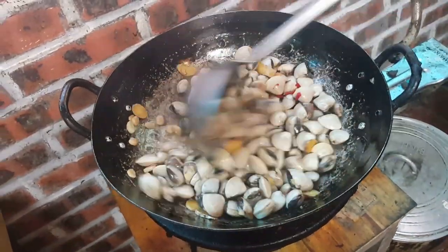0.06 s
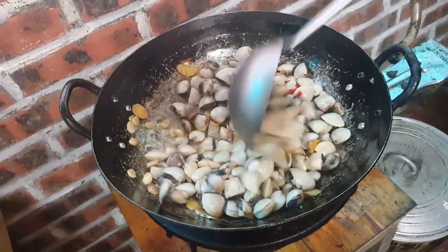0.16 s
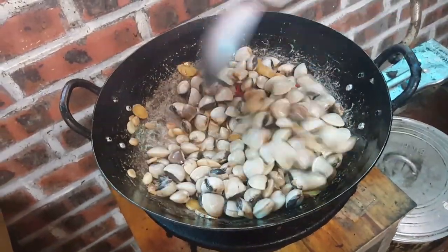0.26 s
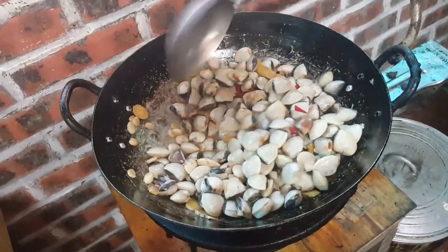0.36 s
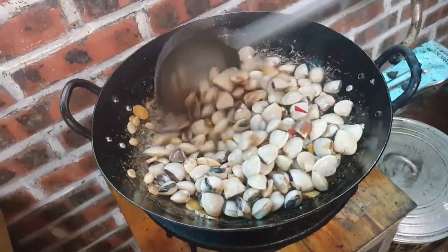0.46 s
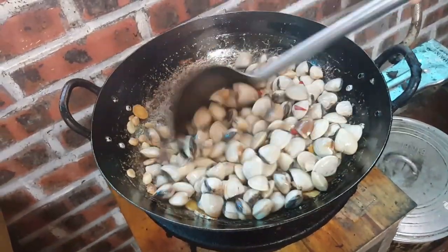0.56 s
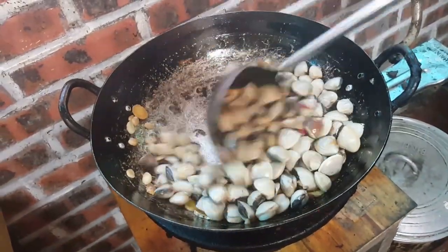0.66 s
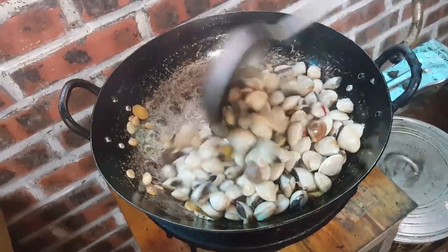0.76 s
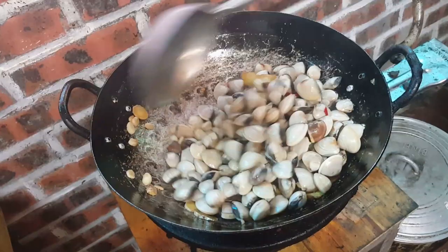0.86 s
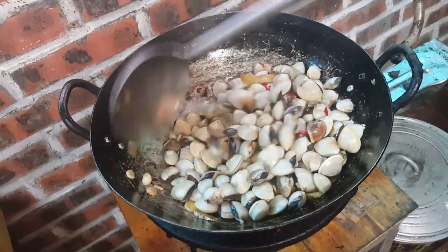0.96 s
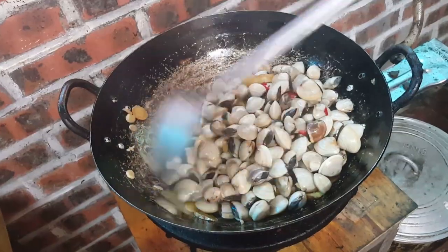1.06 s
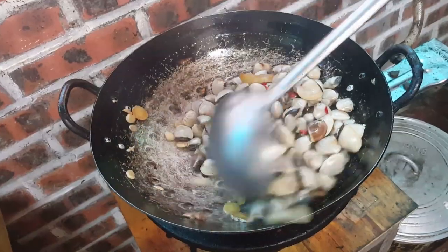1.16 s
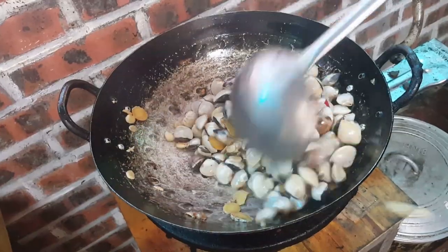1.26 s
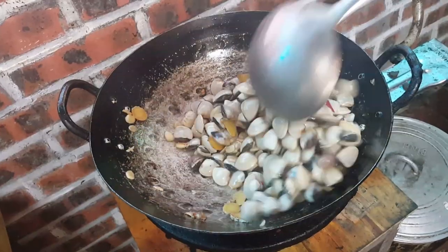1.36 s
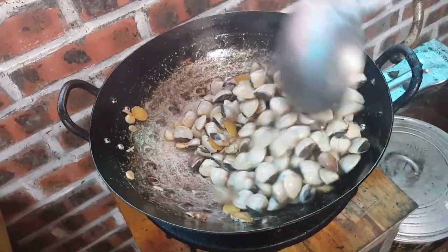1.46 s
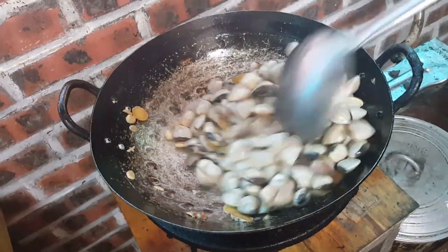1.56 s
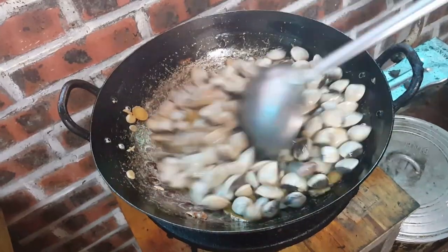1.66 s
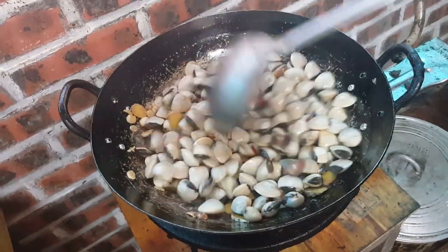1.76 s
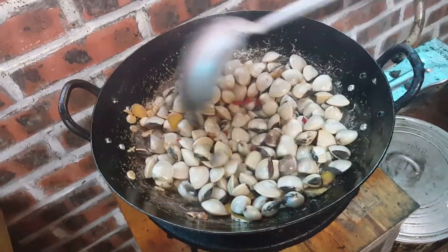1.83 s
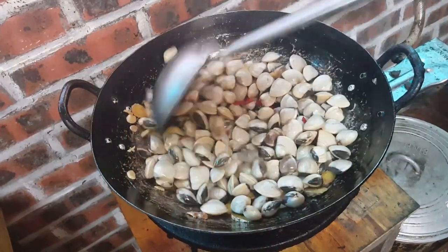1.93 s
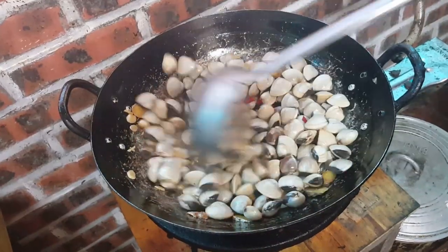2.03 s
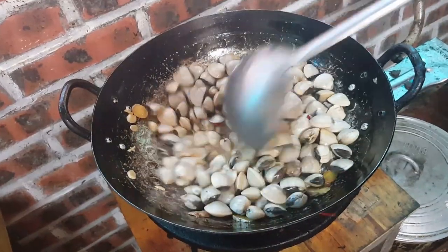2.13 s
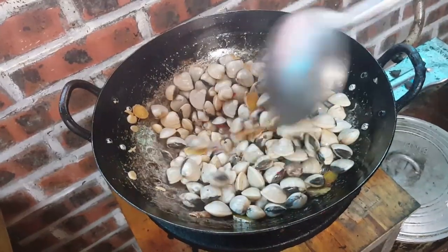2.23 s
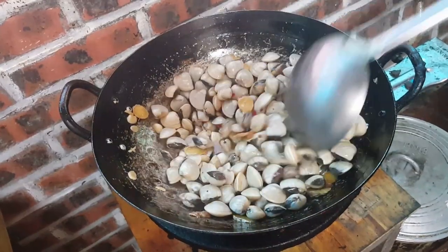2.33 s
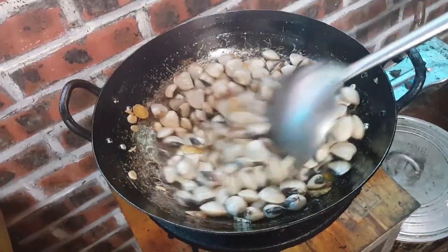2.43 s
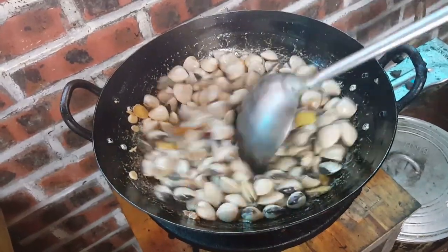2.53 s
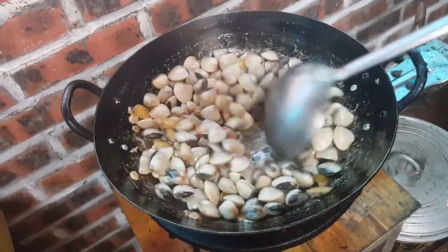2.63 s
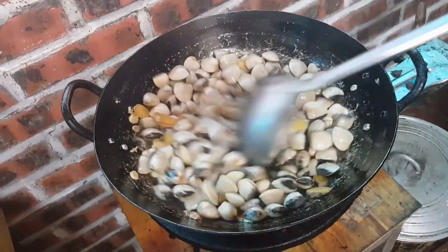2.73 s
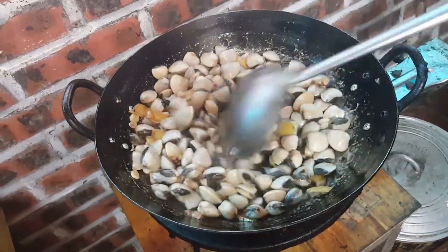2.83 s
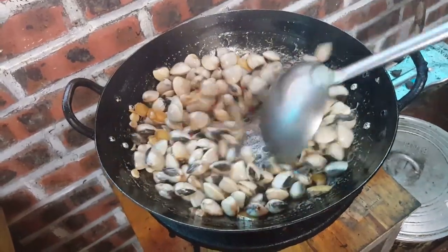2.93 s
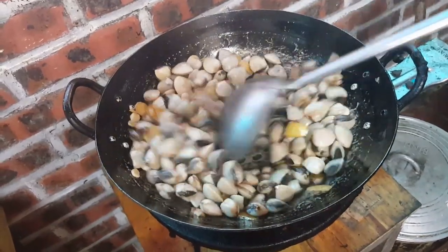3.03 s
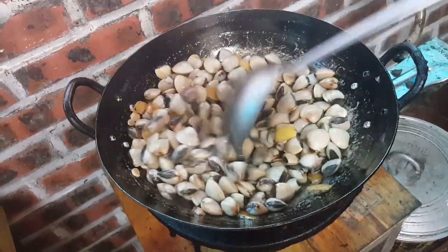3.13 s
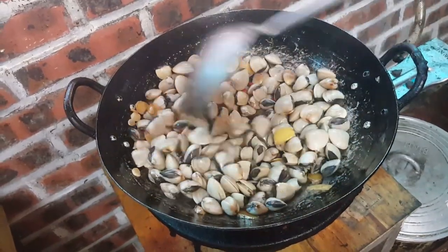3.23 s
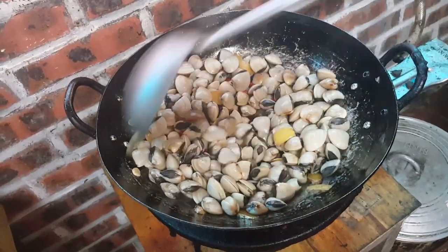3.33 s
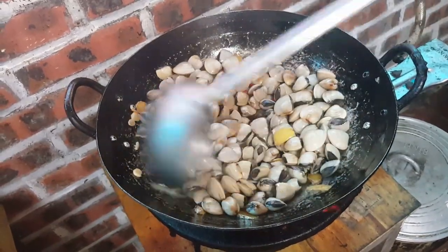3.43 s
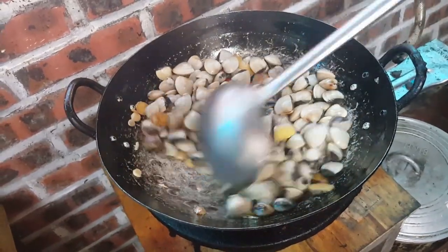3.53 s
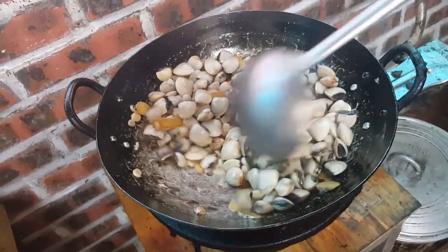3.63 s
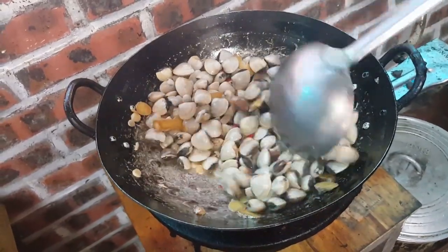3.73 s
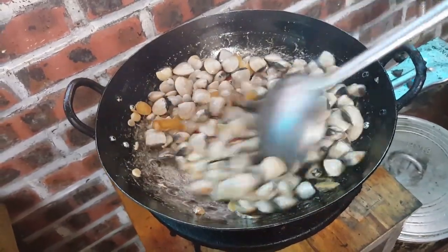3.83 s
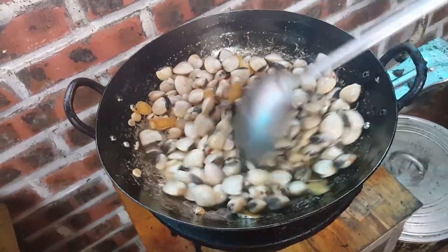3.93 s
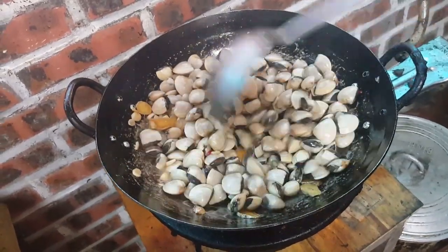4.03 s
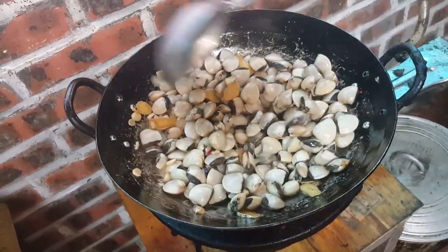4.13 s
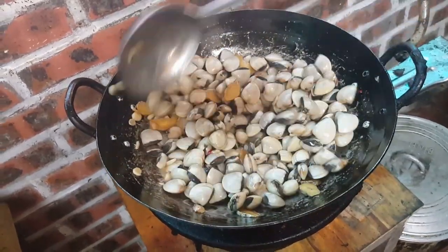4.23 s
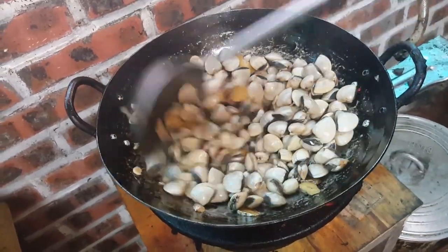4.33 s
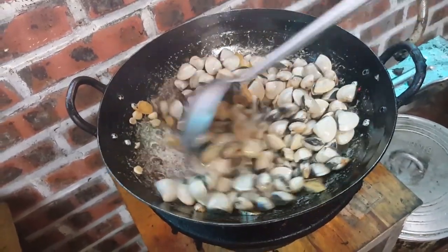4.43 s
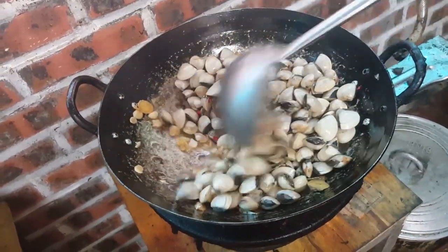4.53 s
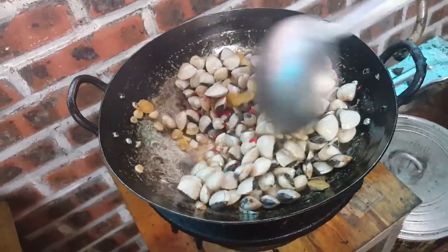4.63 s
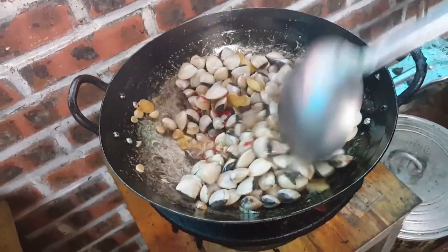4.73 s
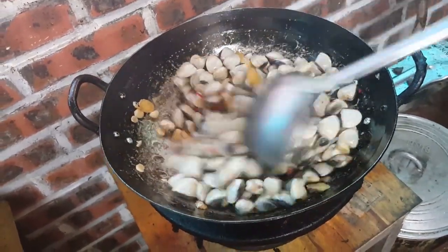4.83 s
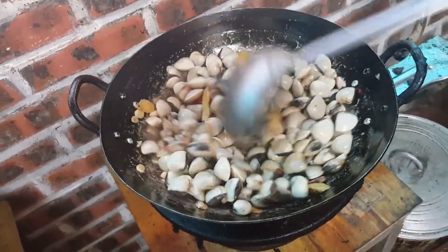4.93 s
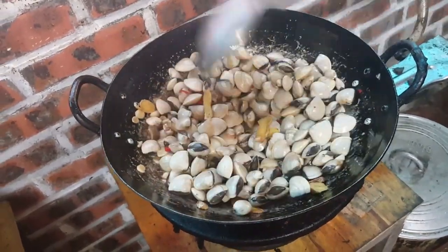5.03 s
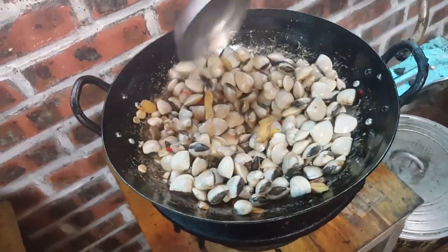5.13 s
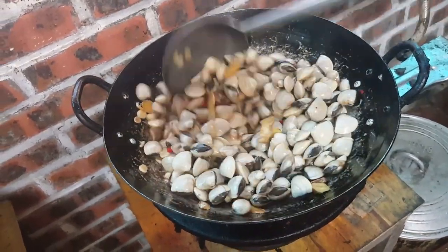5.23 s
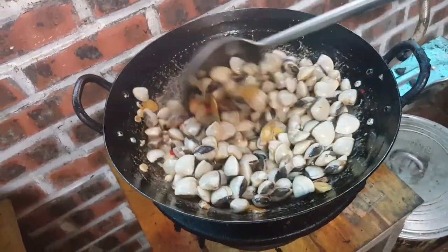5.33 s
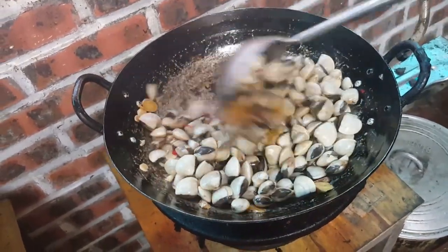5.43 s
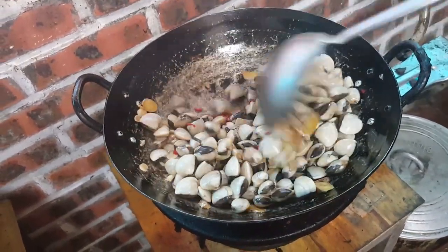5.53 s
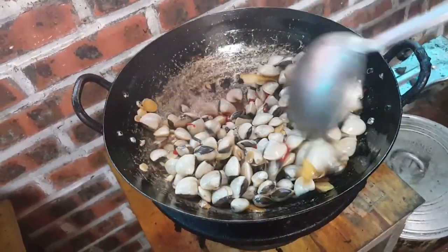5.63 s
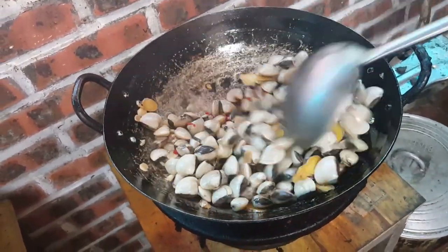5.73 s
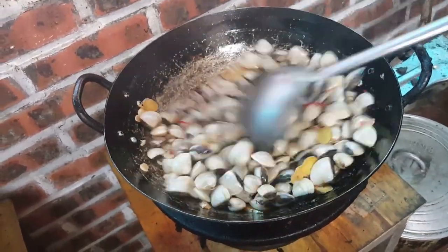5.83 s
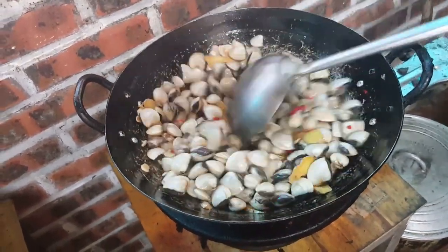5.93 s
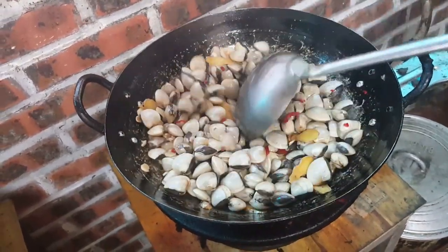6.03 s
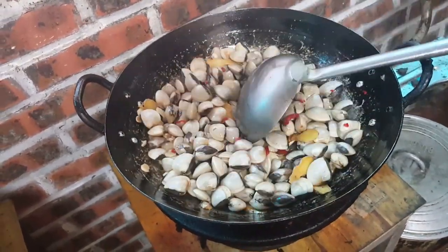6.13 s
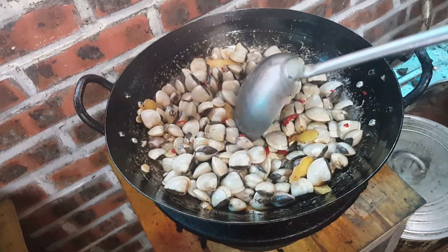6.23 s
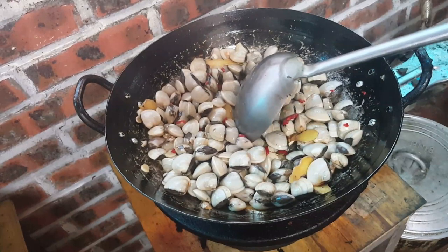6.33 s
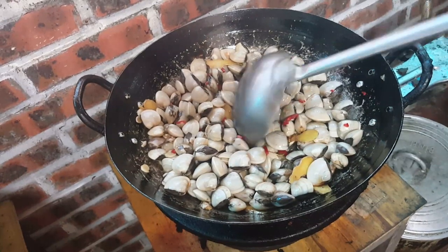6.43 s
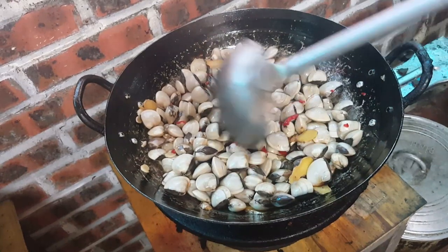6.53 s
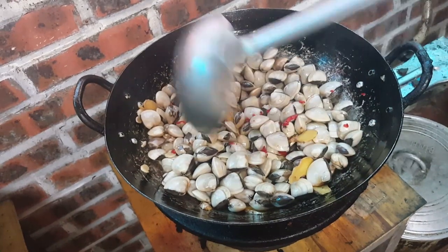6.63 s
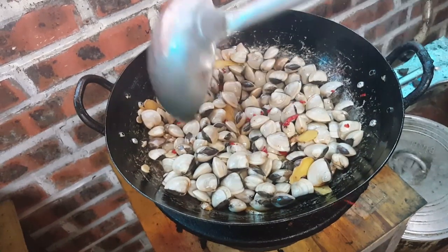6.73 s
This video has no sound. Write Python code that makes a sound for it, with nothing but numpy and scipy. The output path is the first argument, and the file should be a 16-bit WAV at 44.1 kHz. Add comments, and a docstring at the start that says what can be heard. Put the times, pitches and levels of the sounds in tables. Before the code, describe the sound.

Close, wide stereo beside a wok outdoors near a brick wall. At once a ladle thuds dully into small clams, which rattle, clack and drum over bubbling sizzle. Around 0.4-0.6 s come sharp knocks, short sinking scrapes and a shell surge; another push at 1.2 s brings wet hiss. A strong thud and dense clatter land at 1.7 s, with a scrape at 2.0. From 2.1 to 3.1 s quick jabs shake the shells, with a hard knock near 2.5. After a brief lull, a scrape and flaring hiss come at 3.4, and a heavy knock and surge at 3.87. More digging, clinks and scrapes follow at 4.2-4.4, a push at 4.85, scraping at 5.2, and the biggest rattle at 5.85. Then activity fades: a faint knock at 6.24, a lone clink at 6.6, sizzle rising slightly to the end at about 6.8. The low burner roar and hum is strongest mid-way.

```python
"""A steel ladle thuds into a loaded iron wok, outdoors by a brick wall: damped wok modes and a dead thock.
Small clams then clatter, drum and clink: dense random collisions, separate clacks, and ticks with rings.
The ladle's edge scrapes: a stick-slip rasp with a sinking resonance. Juice sizzles as bursting bubbles
and hiss, flaring on bared iron. Below, the burner is filtered noise with a wavering hum; short
reflections surround the wok."""
import sys
import numpy as np
from scipy import signal
from scipy.fft import rfft, irfft, next_fast_len
from scipy.io import wavfile

SR = 44100
rng = np.random.default_rng(int(sys.argv[2]) if len(sys.argv) > 2 else 0)


def unload_audio(sound):
    """Save the sound as a 16-bit wav file, at the path given as the first command line argument."""
    columns = np.transpose(np.atleast_2d(sound))
    # keep every value between -1 and 1, then stretch to whole-number steps
    steps = np.round(np.clip(columns, -1, 1) * 32767)
    wavfile.write(sys.argv[1], SR, steps.astype(np.int16))


N = 298998
TIME = np.arange(N) / SR

# Event and source levels are relative: each source trims them further.
# the ladle digs in and bares iron: start_s, hold_s, shell_level_db, flare_level_db
DIG_STROKES = [(0.05, 0.029, -41, -38), (0.512, 0.044, -27, -38), (1.19, 0.028, -23, -34.5),
               (1.565, 0.09, -42, -40), (1.951, 0.055, -27, -31.5), (3.43, 0.13, -25, -38),
               (4.231, 0.08, -24.5, -42), (4.335, 0.044, -25.5, -27), (5.194, 0.049, -21.5, -35)]
# the heap piles up and tumbles back: crest_s, rise_constant_s, fall_constant_s, shell_level_db, drum_level_db
HEAP_PUSHES = [(.12, 0.12, 0.24, -23.5, -32), (.59, 0.21, 0.17, -22, -32.5), (1.24, 0.16, 0.064, -24, -30),
               (1.675, 0.1, 0.1, -18, -24), (3.54, 0.017, 0.04, -22, -28.5),
               (3.86, 0.14, 0.086, -19, -24.5), (4.41, 0.065, 0.12, -22, -31.5),
               (4.85, 0.086, 0.1, -19.5, -27.5), (5.28, 0.03, 0.33, -24, -32),
               (5.865, 0.097, 0.044, -17.5, -21.5)]
# quick jabs shake the shells: crest_s, shell_level_db
QUICK_JABS = [(2.11, -24.5), (2.39, -25.5), (2.51, -21), (2.651, -22.5), (2.774, -20), (2.925, -20.5),
              (3.042, -19), (3.19, -29), (3.99, -22.5), (5.99, -27.5)]
# steady frying between strokes: time_s, level_db
SIMMER_CURVE = [(0, -22), (.3, -30.5), (.85, -33.5), (1.88, -29.5), (2.3, -35), (2.85, -33.5), (3.35, -30),
                (4.4, -29), (5.12, -30.5), (5.68, -29), (6.12, -37.5), (6.46, -39), (6.57, -31.5),
                (6.78, -31)]
# modes of a struck shell: factor on its ring pitch, level_db
SHELL_MODE_TABLE = [(.6, -14.5), (0.858, -12), (1, -2), (1.33, -7), (1.55, -6)]
# the ladle bumps the wok: start_s, level_db, factor on all mode and thock pitches
LADLE_KNOCKS = [(.002, -4.5, 0.59), (0.094, -11, 0.44), (0.4259, -1, 1.38), (.4425, -1.5, .68),
                (.491, -9.5, 0.7), (1.057, -13, 0.62), (1.707, 1.5, 1.01), (2.441, -7, 1.42),
                (2.4711, -9, 1.14), (2.5298, 2.5, 0.9), (2.684, -7, 0.97), (2.966, -1, 0.94),
                (3.471, -7.5, 0.56), (3.871, 3, 0.98), (4.248, -4, .66), (4.287, -3.5, 0.64),
                (4.383, -13, 1.03), (4.846, -4, 0.98), (5.1945, -12, 1.14), (5.2159, -6, 1.17),
                (5.836, -1, 0.76), (5.8691, 1.5, 0.97), (6.2357, -15.5, 0.99)]
# wok modes damped by the load: frequency_hz (before the knock's factor), level_db, t60_s
WOK_MODES = [(350, -31, 0.047), (522, 7.5, 0.15), (617, 12, 0.1), (735, 9.5, 0.07), (862, 13.5, 0.063),
             (2110, 5.5, 0.032)]
# shell and ladle clink on steel: start_s, level_db, ring_hz, spit_level_db (juice thrown up)
STEEL_CLINKS = [(.0635, -14, 2110, -20.5), (0.16, -13, 2290, -19), (.369, -8.5, 4430, -44),
                (0.413, -10, 1200, -41), (0.5462, -9.5, 2430, -36), (0.5597, -9, 2530, -36),
                (.629, -10.5, 2230, -44), (0.738, -15.5, 4440, -47), (0.7618, -15, 3960, -42),
                (.836, -17, 3750, -45), (0.8636, -8.5, 3880, -34), (1.13, -12, 1750, -23),
                (1.162, -18, 2010, -25), (1.192, -20, 1990, -19.5), (1.4805, -20.5, 1490, -23),
                (1.5732, -13, 1920, -19), (1.636, -8, 4380, -35), (1.669, -11, 2450, -40),
                (1.7068, -12, 2130, -26), (1.8028, -4.5, 2240, -40), (1.9798, -6, 5160, -18),
                (2.1134, -27, 2120, -22), (2.374, -23, 1860, -25.5), (2.4409, -11.5, 2220, -21),
                (2.7455, -22, 2780, -29), (2.7821, -11, 1900, -40), (2.8863, -11.5, 2540, -34),
                (2.9114, -11.5, 2340, -36), (3.161, -14, 2330, -23.5), (3.431, -8.5, 7260, -21),
                (3.818, -10, 2540, -40), (3.9075, -12, 3020, -40), (3.9373, -6.5, 2810, -21.5),
                (4.2461, -11.5, 4310, -18.5), (4.2874, -12, 2570, -32), (4.3196, -13, 2460, -17.5),
                (4.814, -10.5, 2090, -27), (4.8983, -12.5, 2300, -21), (4.989, -7, 2260, -43),
                (5.1949, -6.5, 4090, -22), (5.2151, -8, 1910, -32), (5.278, -9, 2540, -24),
                (5.2835, -14, 5600, -28), (5.4242, -13.5, 1360, -30), (5.531, -12, 3120, -38),
                (5.7184, -13, 5460, -46), (5.808, -6.5, 4350, -36), (5.8368, -12, 1800, -38),
                (5.9162, -12, 2790, -46), (5.928, -18, 2600, -46), (6.619, -13, 2660, -52)]
# the ladle's edge drags over iron: start_s, length_s, rasp_level_db, tone_level_db, first_hz, last_hz
EDGE_SCRAPES = [(0.414, 0.02, -20, -17, 1210, 1130), (0.429, 0.05, -27.5, -24, 660, 298),
                (0.48, 0.04, -21, -28.5, 1160, 264), (0.55, 0.13, -36, -26.5, 1330, 1250),
                (1.565, 0.031, -26.5, -29, 1830, 1820), (1.999, 0.04, -22, -25.5, 1190, 293),
                (2.068, 0.014, -22, -28.5, 480, 440), (2.471, 0.08, -28, -33, 530, 520),
                (3.432, 0.081, -29.5, -33, 590, 267), (4.235, 0.034, -22.5, -21.5, 530, 448),
                (5.193, 0.036, -29, -21, 1080, 261), (5.268, 0.025, -24, -27.5, 945, 696)]
# flame strength: time_s, level_db
FLAME_CURVE = [(0.0, -47), (0.72, -49.5), (3.27, -40.5), (3.55, -33), (5.81, -41), (6.25, -56.5),
               (6.78, -42)]

# Spectra, all with columns frequency_hz, density_db (dB per Hz, relative)
# shells tumbling on each other
SHELL_SPECTRUM = [(150, -25), (400, -11), (900, -2), (1250, -2.5), (2150, 1.5), (3000, -2.5), (4300, -0.5),
                  (7000, -5), (10000, -11.5), (15500, -25)]
# the pan drummed by the shells
DRUM_SPECTRUM = [(60, -69), (150, -13.5), (300, -17.5), (360, -5.5), (420, -10.5), (485, 3.5), (680, -10.5),
                 (745, 0), (950, -5.5), (1400, -30), (4000, -52)]
# steady frying
SIZZLE_SPECTRUM = [(200, -2), (1000, 3), (2500, 5.5), (4200, 3.5), (7000, 5), (8700, 3.5), (10200, -4),
                   (11800, 1.5), (15500, -2.5)]
# fresh juice on hot iron
FLARE_SPECTRUM = [(300, -3.5), (2500, -6), (7000, 4.5), (10000, 0), (12000, 5.5), (15500, -2)]
# a hard tick on steel
TICK_SPECTRUM = [(100, -18), (500, 0), (6500, 0), (14000, -10)]
# the ladle's scraping edge
RASP_SPECTRUM = [(100, -14), (400, 7), (1200, 7), (2200, -7), (4500, 8.5), (7000, 4.5), (10000, -6),
                 (11500, 1), (15500, -8)]
# the flame's roar
BURNER_SPECTRUM = [(24, -62), (43, -27), (65, -22), (100, -9.5), (125, 4.5), (170, -17), (1500, -23.5),
                   (8000, -41)]
# the reflected sound: frequency_hz, gain_db
REFLECTION_SPECTRUM = [(100, -4.0), (600, 0.0), (4000, 5), (14000, -16.0)]

# likeness of the two microphones: frequency_hz, coherence (interpolated, then limited to 0-1)
MICROPHONE_LIKENESS = [(100, 2.7), (350, 0.74), (700, 0.95), (1400, 0.5), (2800, 0.29), (5000, -0.41)]
# level difference of the microphones: frequency_hz, left_minus_right_db
MICROPHONE_BALANCE = [(500, 2), (1700, 4), (3000, 2.5), (4300, 1), (6400, 7), (8200, -1.5), (9800, -7),
                      (12000, -3), (15000, 0)]

EDGE_HZ = 15600  # upper band limit
DIG_ATTACK_S, DIG_RELEASE_S = 0.003, 0.04
PUSH_CREST_S = 0.019  # how rounded the top of a push is
JAB_RISE_S, JAB_FALL_S, JAB_CREST_S = 0.027, 0.03, 0.012
JAB_DRUM_FALL_S = 0.061  # the shells keep drumming a little longer
# relative to the stroke's shell level
DIG_DRUM_DB, JAB_DRUM_DB, JAB_FLARE_DB, STIRRED_SIZZLE_DB = -8, -8, -24, -9
SIMMER_SHELLS_DB, SIMMER_DRUM_DB = -1.5, -13.5  # boiling juice also rattles the shells


def stirring():
    """Power summation: incoherent strokes and simmer add as squares to drive shells, drum, frying and flares."""
    shell_power, drum_power, flare_power = np.zeros((3, N))
    for start, hold, shell_db, flare_db in DIG_STROKES:
        t = TIME - start
        release = np.exp(-np.clip((t - hold) / DIG_RELEASE_S, 0, 20))
        dig = np.clip(t / DIG_ATTACK_S, 0, 1) * release
        shell_power += (amp(shell_db) * dig) ** 2
        drum_power += (amp(shell_db + DIG_DRUM_DB) * dig) ** 2
        flare_power += (amp(flare_db) * dig) ** 2
    for crest, rise, fall, shell_db, drum_db in HEAP_PUSHES:
        push = swell(crest, rise, fall, PUSH_CREST_S)
        shell_power += (amp(shell_db) * push) ** 2
        drum_power += (amp(drum_db) * push) ** 2
    for crest, shell_db in QUICK_JABS:
        jab = amp(shell_db) * swell(crest, JAB_RISE_S, JAB_FALL_S, JAB_CREST_S)
        jab_drum = swell(crest, JAB_RISE_S, JAB_DRUM_FALL_S, JAB_CREST_S)
        shell_power += jab ** 2
        flare_power += (amp(JAB_FLARE_DB) * jab) ** 2
        drum_power += (amp(shell_db + JAB_DRUM_DB) * jab_drum) ** 2
    shells, drum, flare = np.sqrt([shell_power, drum_power, flare_power])
    simmer = level(SIMMER_CURVE)
    shell_gain = np.hypot(shells, amp(SIMMER_SHELLS_DB) * simmer)
    drum_gain = np.hypot(drum, amp(SIMMER_DRUM_DB) * simmer)
    fry_gain = np.hypot(amp(STIRRED_SIZZLE_DB) * shells, simmer)
    return shell_gain, drum_gain, fry_gain, flare


def swell(crest, rise_s, fall_s, round_s):
    """Exponential growth and decay about a rounded crest of height 1."""
    t = TIME - crest
    distance = np.hypot(t, round_s) - round_s
    return np.exp(-np.minimum(distance / np.where(t < 0, rise_s, fall_s), 20))


def jolts(per_s=35, settle_s=0.0037, depth=0.42):
    """Random impulsive release: small slides of the heap start at once and settle exponentially."""
    kicks = (rng.random(N) < per_s / SR) * rng.random(N)
    slides = decaying(kicks, settle_s)
    return unit(1 + np.tanh(depth * slides))


def clatter(shell_gain, drum_gain):
    """Random collision noise: shells tumble over each other and drum on the pan as the heap turns."""
    shells = grains(per_s=650, scatter_db=3.5, tick_s=0.00053, ring_s=0.0029, ring=0.81)
    drumming = grains(per_s=800, scatter_db=3.0, tick_s=0.0011, ring_s=0.0016, ring=0.12)
    shells = unit(spread(colour(shells, SHELL_SPECTRUM)))
    drumming = unit(spread(colour(drumming, DRUM_SPECTRUM)))
    return amp(-4) * shell_gain * shells + amp(-2.5) * drum_gain * drumming


def clacks(shell_gain, per_s=90, middle_hz=2500, pitch_spread=.33, cycles=6.7, clack_db=-0.5):
    """Impact of whole shells: separate clacks of log-normally varied pitch stand out of the rattle."""
    out = np.zeros((2, N))
    for at in np.flatnonzero(rng.random(N) < per_s / SR):
        hz = middle_hz * np.exp(pitch_spread * rng.standard_normal())
        strength = shell_gain[at] * amp(clack_db) * rng.uniform(0.33, 1)
        add(out, at / SR, strength * clack(hz, cycles))
    return out


def clack(hz, cycles, detune=.12):
    """Modal decay of one shell: detuned modes, the high ones out of step at the two microphones."""
    t = np.arange(SR // 25) / SR
    ratio, mode_db = np.transpose(SHELL_MODE_TABLE)[:, :, None]
    modes_hz = hz * ratio ** (1 + detune * rng.standard_normal(ratio.shape))
    lag_s = rng.standard_normal((2, len(ratio), 1)) * .00004
    turns = modes_hz * (t + lag_s) + rng.random(ratio.shape)
    decay = np.exp(-t * modes_hz / cycles)  # each mode falls by 1/e in this many cycles
    modes = amp(mode_db) * np.sin(2 * np.pi * turns) * decay
    return struck(modes.sum(1))


def knocks(low_hz=230, thock_hz=790, thock_db=2, thock_s=.002):
    """Damped modal impact: a dead thock and wok modes, stopped by the wet load; an open pan radiates little bass."""
    out, t = np.zeros((2, N)), np.arange(SR // 8) / SR
    radiation = signal.butter(2, low_hz, "high", fs=SR, output="sos")
    hz, mode_db, t60 = np.transpose(WOK_MODES)[:, :, None]
    mode_decay = np.exp(-np.log(1000) * t / t60)
    for start, db, pitch in LADLE_KNOCKS:
        phase = (rng.random((len(WOK_MODES), 1)) - .5) * np.pi  # the spot that is struck varies
        modes = amp(mode_db) * mode_decay * np.sin(2 * np.pi * hz * pitch * t + phase)
        thock = np.sin(2 * np.pi * thock_hz * pitch * t) * np.exp(-t / thock_s)
        blow = struck(modes.sum(0)) + amp(thock_db) * struck(thock)
        ring = struck(signal.sosfilt(radiation, blow))
        add(out, start, amp(db - 13.5) * np.array([ring, ring]))
    return out


def clinks(wet_tick_db=7, damping=2, tick_s=.0018, tick_db=-5, dry_ring_s=.0038):
    """Contact and liquid damping: a broad tick, then a shell's ring; juice sharpens the tick and damps the ring."""
    out, t = np.zeros((2, N)), np.arange(SR // 25) / SR
    for start, db, hz, spit_db in STEEL_CLINKS:
        ring_s = dry_ring_s / (1 + damping * amp(spit_db - db))
        burst = spread(rng.standard_normal((2, len(t)))) * np.exp(-t / tick_s)
        tick = struck(colour(burst, TICK_SPECTRUM))
        ring = amp(db) * clack(hz, hz * ring_s)
        tick_gain = np.hypot(amp(db + tick_db), amp(spit_db + wet_tick_db))
        add(out, start, amp(-8.5) * (ring + tick_gain * tick))
    return out


def scrapes(width_hz=220, fade_db=5, thrum_db=-8, thrum_hz=500):
    """Stick-slip friction: a rasp excites a hollow resonance that sinks as the ladle slides."""
    out = np.zeros((2, N))
    catches = grains(per_s=1700, scatter_db=0.0, tick_s=0.000057, ring_s=0.0039, ring=0.82)
    rasp = unit(spread(colour(catches, RASP_SPECTRUM)))
    slips = rng.standard_normal(N)
    pan_band = signal.butter(2, [110, 420], "band", fs=SR, output="sos")
    thrum = unit(signal.sosfilt(pan_band, slips))
    radius = np.exp(-np.pi * width_hz / SR)
    for start, length, rasp_db, tone_db, first_hz, last_hz in EDGE_SCRAPES:
        span = slice(round(start * SR), round((start + length) * SR))
        u = np.linspace(0, 1, span.stop - span.start)
        hz = first_hz * (last_hz / first_hz) ** u
        turn = np.exp(2j * np.pi * np.cumsum(hz) / SR)
        # shift the moving resonance to zero frequency, filter there, shift it back
        envelope = signal.lfilter([1], [1, -2 * radius, radius ** 2], slips[span] / turn)
        tone = unit((turn * envelope).real)
        shake = amp(thrum_db) * np.minimum(thrum_hz / hz, 1) ** 2  # low scrapes shake the whole pan
        press = amp(-fade_db * u) * np.minimum(10 * (1 - u), 1)  # lands hard, eases off
        hollow = amp(tone_db) * (tone + shake * thrum[span])
        add(out, start, press * (amp(rasp_db) * rasp[:, span] + hollow))
    return out


def sizzle(fry_gain, flare_gain, spit_s=0.015):
    """Vapour bubble bursting: tiny pops over even hiss; digs, jabs and clinks bring juice to hot iron, which spits."""
    pops = grains(per_s=1500, scatter_db=-3.0, tick_s=0.00015, ring_s=0.0003, ring=1.0)
    frying = pops + amp(5.5) * rng.standard_normal((2, N))
    frying = unit(spread(colour(frying, SIZZLE_SPECTRUM)))
    splashes = np.zeros(N)
    for start, *_, spit_db in STEEL_CLINKS:
        splashes[round(start * SR)] = amp(spit_db)
    spits = decaying(splashes, spit_s)
    bursts = grains(per_s=2200, scatter_db=3.5, tick_s=0.00013, ring_s=0.00088, ring=0.59)
    steam = bursts + amp(-2) * rng.standard_normal((2, N))
    steam = unit(spread(colour(steam, FLARE_SPECTRUM)))
    steam = jolts(per_s=120, settle_s=0.0062, depth=1.0) * steam
    return fry_gain * frying + np.hypot(amp(7) * flare_gain, spits) * steam


def burner(hum_hz=93.8, width_hz=4):
    """Combustion noise and resonance: a low roar with a phase-wavering hum at the stove's resonance."""
    roar = unit(spread(colour(rng.standard_normal((2, N)), BURNER_SPECTRUM)))
    slow = signal.butter(2, width_hz, fs=SR, output="sos")
    waver = unit(signal.sosfilt(slow, rng.standard_normal(N)))
    hum = unit(np.sin(2 * np.pi * hum_hz * TIME + .5 * waver))
    return level(FLAME_CURVE) * amp(-8.0) * (roar + hum / np.sqrt(2))


def yard(x, t60=0.35, first_s=0.0032, size=2048):
    """Diffuse reflection from pan and wall: decaying random paths, redrawn per block as the shells move."""
    t = np.arange(6 * size) / SR
    fade = np.exp(-np.log(1000) * t / t60) * (t > first_s)
    fade /= np.linalg.norm(fade)
    out, window = np.zeros((2, N)), signal.windows.cosine(size)
    for at in range(0, N - size, size // 2):
        paths = rng.standard_normal((2, len(t))) * fade
        block = x[:, at:at + size] * window
        add(out, at / SR, signal.fftconvolve(block, paths, axes=1))
    return spread(colour(out, REFLECTION_SPECTRUM))


def grains(per_s, scatter_db, tick_s, ring_s, ring, size=640):
    """Poisson collisions: ticks with brief rings of random pitch; scatter_db sets the spread of strengths."""
    t, out = np.arange(size) / SR, np.zeros((2, N + size))
    starts = np.flatnonzero(rng.random(N) < per_s / SR)
    chance = rng.random((N, 2))[starts]
    strength = amp(scatter_db * np.minimum(-np.log(1 - chance[:, 0]), 3.2))
    pitch_hz = np.geomspace(1000, 13000, 400)[:, None, None]
    phase = rng.random((len(pitch_hz), 2, 1))
    waves = np.sin(2 * np.pi * (pitch_hz * t + phase))
    tones = unit(waves * np.exp(-t / ring_s) * pitch_hz ** .25)
    crunch, decay = rng.standard_normal((2, N + size)), unit(np.exp(-t / tick_s))
    choices = (chance[:, 1] * len(pitch_hz)).astype(int)
    for at, gain, which in zip(starts, strength, choices):
        tick = crunch[:, at:at + size] * decay
        out[:, at:at + size] += gain * (tick + ring * tones[which])
    return unit(out[:, :N])


def decaying(impulses, decay_s):
    """First-order relaxation: every impulse dies away exponentially."""
    return signal.lfilter([1], [1, -np.exp(-1 / (decay_s * SR))], impulses)


def struck(sound, size=176):
    """Onset normalisation: rms 1 over a blow's first four milliseconds."""
    return sound / np.sqrt(np.mean(sound[..., :size] ** 2))


def colour(x, points, size=4096):
    """Minimum-phase filtering: a causal response with the given spectrum keeps sharp fronts."""
    log_gain = np.log(amp(read(points, abs(np.fft.fftfreq(size, 1 / SR)))))
    response = np.exp(np.conj(signal.hilbert(log_gain)))
    taps = np.fft.ifft(response).real[:size // 2]
    return signal.oaconvolve(x, taps[None], axes=1)[:, :x.shape[1]]


def spread(x):
    """Spatial coherence: bass reaches both microphones nearly alike, treble does not."""
    size = next_fast_len(x.shape[1])
    a, b = rfft(x, size)
    same = np.clip(read(MICROPHONE_LIKENESS, np.fft.rfftfreq(size, 1 / SR)), 0, 1)
    right = same * a + np.sqrt(1 - same ** 2) * b
    return irfft(np.array([a, right]), size)[:, :x.shape[1]]


def amp(db):
    """Logarithmic level: converts decibels to amplitude gain."""
    return 10 ** (np.asarray(db) / 20)


def unit(x):
    """Energy normalisation: scales to rms 1."""
    return x / np.sqrt(np.mean(x ** 2) + 1e-20)


def read(points, hz):
    """Logarithmic frequency: interpolates a table along a log axis."""
    f, value = np.transpose(points)
    return np.interp(np.log(hz + 1), np.log(f), value)


def level(rows):
    """Level envelope: interpolates time_s, level_db rows in dB into a gain for every sample."""
    time_s, level_db = np.transpose(rows)
    return amp(np.interp(TIME, time_s, level_db))


def add(mix, start_s, sound):
    """Superposition: adds a two-channel sound in at its start time."""
    part = mix[:, max(round(start_s * SR), 0):][:, :sound.shape[1]]
    part += sound[:, :part.shape[1]]


def scene():
    """Superposition of the wok's sources, their reflections and the flame."""
    shell_gain, drum_gain, fry_gain, flare_gain = jolts() * np.array(stirring())
    wok = clatter(shell_gain, drum_gain) + clacks(shell_gain)
    wok += knocks() + clinks() + scrapes()
    wok += sizzle(fry_gain, flare_gain)
    return wok + amp(-7.0) * yard(wok) + burner()


def record(dry):
    """Linear filtering: each microphone has its own colour, then a low-pass limits the band."""
    size = next_fast_len(N)
    balance_db = read(MICROPHONE_BALANCE, np.fft.rfftfreq(size, 1 / SR))
    tilt_db = balance_db * np.array([[.5], [-.5]])
    heard = irfft(rfft(dry, size) * amp(tilt_db), size)[:, :N]
    low_pass = signal.firwin(401, EDGE_HZ, window=("kaiser", 9), fs=SR)
    return signal.oaconvolve(heard, low_pass[None], "same")


dry = scene()
out = record(dry)
unload_audio(out)
```